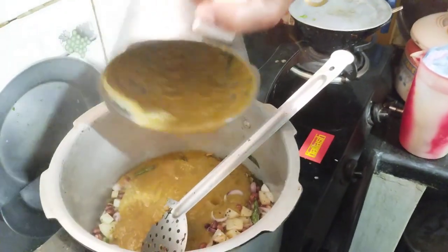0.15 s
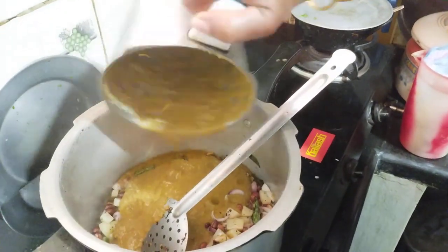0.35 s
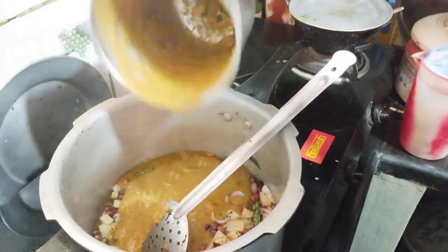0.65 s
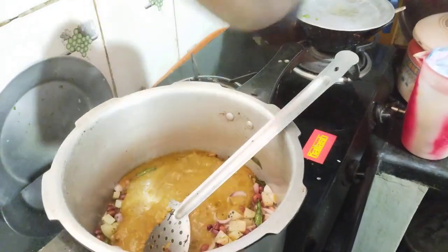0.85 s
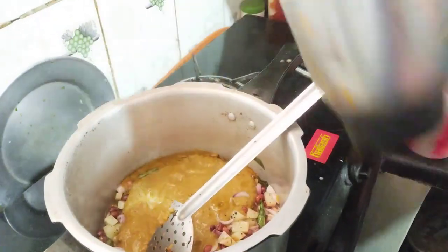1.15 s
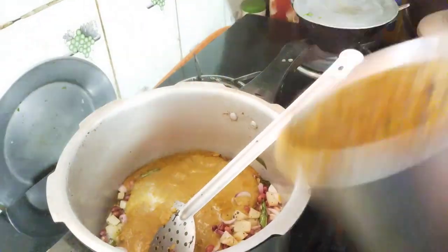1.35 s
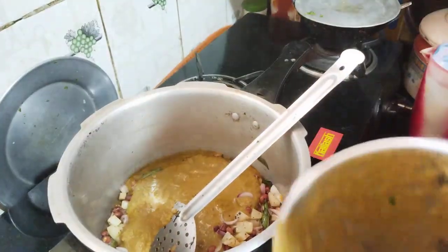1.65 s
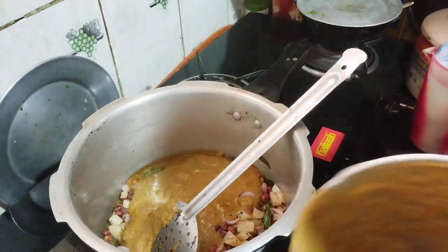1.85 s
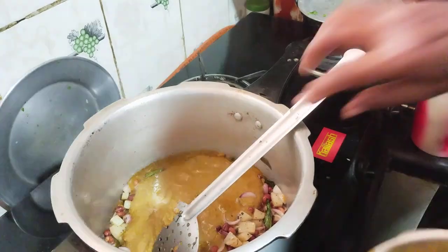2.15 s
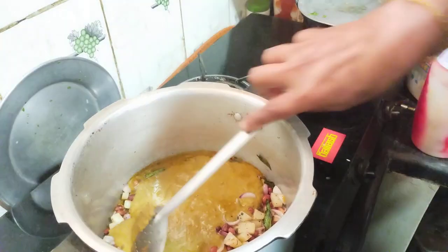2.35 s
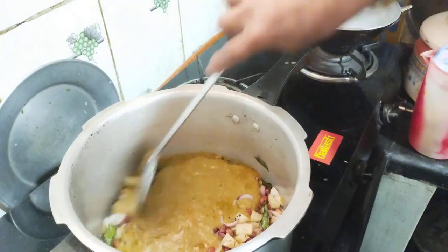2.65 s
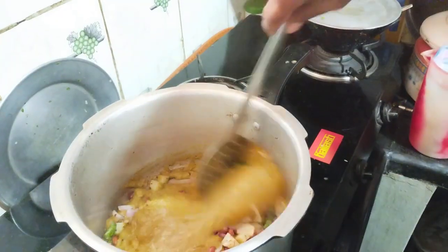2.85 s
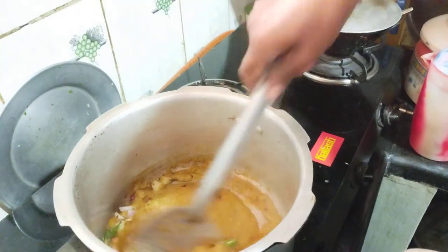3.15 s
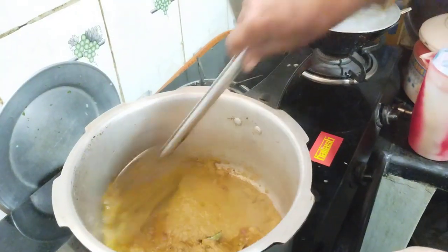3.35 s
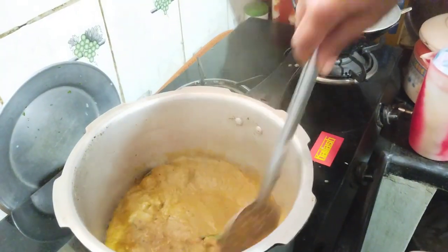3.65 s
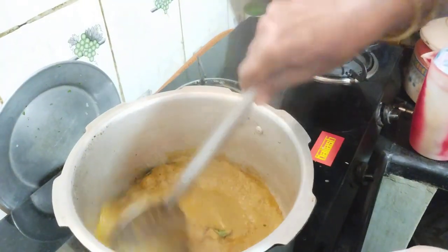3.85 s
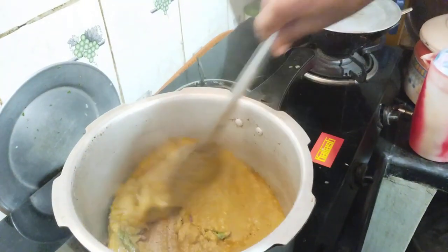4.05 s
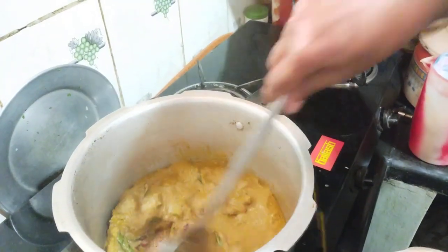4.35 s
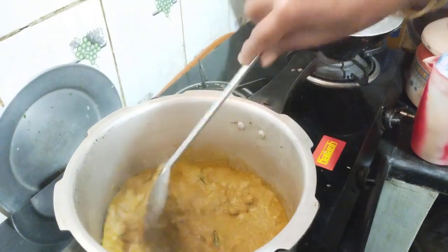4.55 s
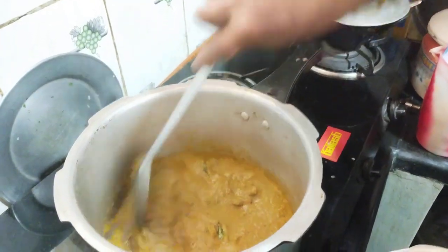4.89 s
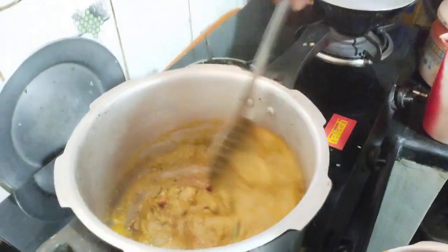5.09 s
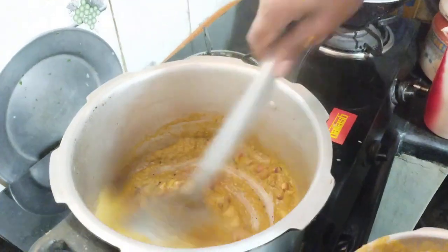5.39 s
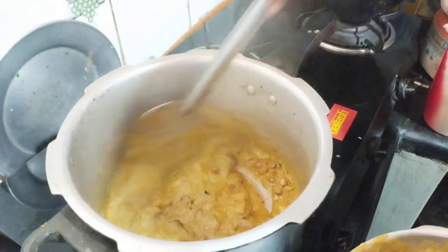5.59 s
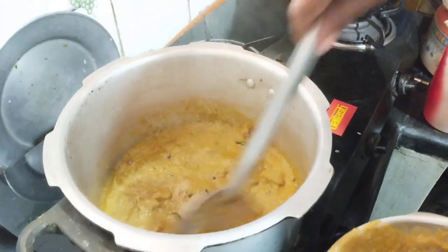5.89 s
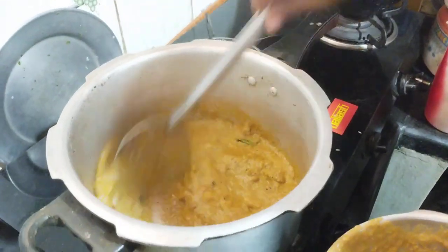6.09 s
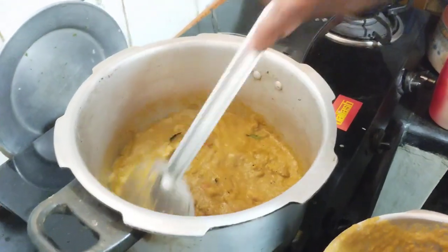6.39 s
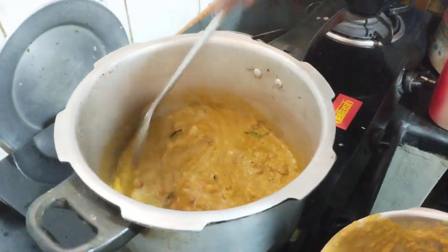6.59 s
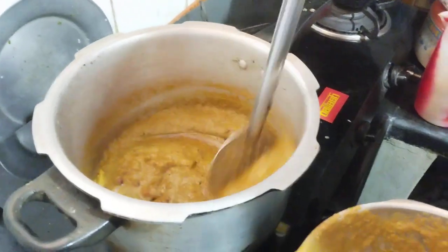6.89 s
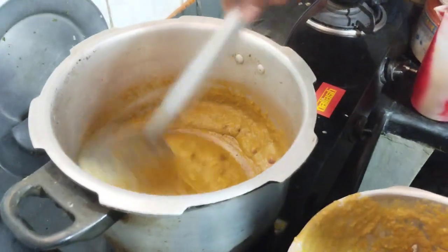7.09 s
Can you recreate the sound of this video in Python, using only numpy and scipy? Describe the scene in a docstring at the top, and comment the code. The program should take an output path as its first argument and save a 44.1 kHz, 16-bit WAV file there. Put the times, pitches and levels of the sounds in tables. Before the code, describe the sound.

Wet spice paste sizzles fiercely in hot oil inside a metal pot, spitting and crackling, while a steel spoon knocks, scrapes and stirs in sweeps.

```python
"""Kitchen with a gas stove: wet ground masala fries in hot oil in an open pressure cooker, heard close by.
Steam bubbles burst as random clicks coloured by the pot; the sizzle flares as wet paste meets hot metal, then cools.
Drops crackle and spit in the oil, and a spoon churns the paste in swelling sweeps of soft lumps.
A jar put down and a steel spoon knock as noise plus ringing modes; scrapes are stick-slip clicks.
Jar and rocking pot land with thud, boom and clank, over the burner's filtered noise and two hums."""
import sys
import numpy as np
from scipy import signal
from scipy.fft import rfft, irfft
from scipy.io import wavfile

SR = 44100
rng = np.random.default_rng(int(sys.argv[2]) if len(sys.argv) > 2 else 0)


def digitize_waveform(pressure):
    """Quantize a signal to 16-bit integers and store it at the path in sys.argv[1].

    Rows of a 2-D input are taken as channels; values are limited to [-1, 1].
    """
    field = np.atleast_2d(pressure).T
    bounded = np.clip(field, -1, 1)
    quanta = np.round(bounded * 32767).astype(np.int16)
    wavfile.write(sys.argv[1], SR, quanta)


N = 318843
TAPS = 4096
TIME = np.arange(N) / SR
HZ = np.fft.rfftfreq(TAPS, 1 / SR)

# dense clatter of metal on metal: f/Hz, level/dB
CLATTER_SPECTRUM = [(30, -36), (150, -17), (280, 0), (500, -5.5), (850, -5.5), (1300, -4.5), (1650, -2),
                    (2200, 3), (3300, -2.5), (6000, 0.5), (9000, 6), (11500, -11), (15700, -36)]
# pot wall modes: f/Hz, mean level/dB, t60/s before stretch
WALL_MODES = [(547, -4, .3), (830, -6, .3), (1072, -5, .4), (1203, -6, .35), (1322, -5, .22),
              (1640, -10, .3), (1990, -1, .15), (2140, -2, .16), (2300, -4, .2), (2570, 0, .25),
              (2940, -7, .25), (4463, -7, .35)]


def amp(db):
    """Decibels to gain."""
    return 10 ** (np.asarray(db) / 20)


def unit(x):
    """Scales to rms 1."""
    return x / np.sqrt(np.mean(x ** 2) + 1e-20)


def read(points, hz):
    """Interpolates a dB spectrum on a log-frequency axis."""
    f, db = np.transpose(points)
    return np.interp(np.log(hz + 1), np.log(f), db)


def add(mix, start_s, sound):
    """Adds a sound into mix at start_s, cut at the end."""
    part = mix[max(round(start_s * SR), 0):][:len(sound)]
    part += sound[:len(part)]


def colour(x, db):
    """Minimum-phase filter with the gain db on the grid HZ, via the folded cepstrum."""
    cepstrum = irfft(np.log(amp(np.maximum(db, -100))))
    cepstrum[1:TAPS // 2] *= 2
    cepstrum[TAPS // 2 + 1:] = 0
    impulse = irfft(np.exp(rfft(cepstrum)))
    return signal.oaconvolve(x, impulse)[:len(x)]


def shaped(x, db):
    """Colours a white sound and keeps its power."""
    return colour(x, db) / np.sqrt(np.mean(amp(db) ** 2))


def drift(rate_hz):
    """Smooth random signal of rms 1, varying about rate_hz times a second."""
    f = np.fft.rfftfreq(N, 1 / SR)
    band = np.exp(-(f / rate_hz) ** 2) * (f > rate_hz / 8)
    return unit(irfft(rfft(rng.standard_normal(N)) * band, N))


def bursts(per_s, spread_db, cap=2.4):
    """Random clicks of rms 1: many small, a few large; sizes exponential in dB up to a cap."""
    size = amp(spread_db * np.minimum(rng.exponential(1, N), cap))
    sign = rng.choice([-1, 1], N)
    fires = rng.random(N) < per_s / SR
    return unit(size * sign * fires)


def scatter(clicks, t60_s, wet_db):
    """Each click bounces round the pot: its energy lingers as a dying noise wash."""
    keep = 1e-6 ** (1 / (t60_s * SR))
    energy = signal.lfilter([1 - keep], [1, -keep], clicks ** 2)
    wash = np.sqrt(energy) * rng.standard_normal(N)
    return unit(clicks + amp(wet_db) * wash)


def echoes(x, t60_s, wet_db, gap_s):
    """Adds a dense decaying tail of reflections that starts after gap_s."""
    t = np.arange(SR // 2) / SR
    tail = rng.standard_normal(len(t)) * amp(-60 * t / t60_s) * (t > gap_s)
    wet = signal.oaconvolve(x, tail / np.linalg.norm(tail))[:len(x)]
    return (x + amp(wet_db) * wet) / np.hypot(1, amp(wet_db))


def pot_air():
    """Gain in dB of the pot's air cavity: resonant peaks on the grid HZ."""
    # air resonances: f/Hz, full width at half lift/Hz, lift/dB before the caller's scaling
    air_modes = [(199, 20, 15.5), (484, 96, 10), (649, 84, 6), (1314, 200, 8), (2070, 130, -0.5),
                 (2200, 330, 0), (3500, 33, 7.5), (5880, 720, 5)]
    return sum(db / (1 + (2 * (HZ - hz) / width_hz) ** 2) for hz, width_hz, db in air_modes)


def wall_colour(lift_db, width_hz):
    """Gain in dB that the wall modes give to whatever rubs on the wall."""
    return sum(lift_db / (1 + (2 * (HZ - hz) / width_hz) ** 2) for hz, _, _ in WALL_MODES)


def ring(modes, t, lowpass_hz, stretch):
    """Exponentially dying modes; each blow re-weights them at random, as if struck on another spot."""
    hz, db, t60_s = np.transpose(modes)[:, :, None]
    size = amp(db + rng.standard_normal(hz.shape)) / np.hypot(1, (hz / lowpass_hz) ** 2)
    decay = np.exp(-np.log(1000) * t / (t60_s * stretch))
    tone = np.sin(2 * np.pi * (hz * t + rng.random(hz.shape)))
    return (size * decay * tone).sum(0)


def clank(t, edge_hz, ring_db, stretch, decay_s, snap_db):
    """Metal meets metal: snap, clatter and wall ring; harder, lighter taps lack bass."""
    snap = amp(snap_db) * np.exp(-t / .0015)
    dying = snap + np.exp(-t / decay_s) + .08 * np.exp(-t / .04)
    bass_hz = 1350 * (edge_hz / 9000) ** 3  # softer, heavier blows reach lower
    thin = -10 * np.log10(1 + (bass_hz / (HZ + 1)) ** 2)
    dull = -10 * np.log10(1 + (HZ / edge_hz) ** 3)
    shape = read(CLATTER_SPECTRUM, HZ) + 0.52 * pot_air() + thin + dull
    clatter = shaped(rng.standard_normal(len(t)) * dying, shape)
    return clatter + amp(ring_db) * colour(ring(WALL_MODES, t, edge_hz, stretch), thin)


def kitchen(burner_db=-49):
    """The gas flame rushes as low filtered noise over two hums of wandering phase."""
    # burner rush: f/Hz, relative level/dB
    rush = [(15, -2), (30, 7.5), (70, 1.5), (100, -1), (145, -16), (220, -4), (400, -9), (900, -13),
            (3000, -18)]
    # steady hums: f/Hz, rms level/dB
    hum_tones = [(49.5, -57), (81.5, -59.5)]
    flame = amp(burner_db) * unit(colour(rng.standard_normal(N), read(rush, HZ)))
    hum = np.zeros(N)
    for hz, db in hum_tones:
        phase = 2 * np.pi * hz * TIME + 0.42 * drift(3)
        hum += amp(db) * np.sqrt(2) * np.sin(phase)
    return flame + hum


def landings(boom_db=-1.0, thud_db=-2.1, thud_decay_s=0.028, clank_db=-2.0):
    """The jar set down, then the pot rocking: each lands twice with thuds, dull clanks and one low boom."""
    # landings, the jar's first, then the pot's: t/s, relative level/dB
    touchdowns = [(1.308, -26.5), (1.748, -30.5), (1.777, -34), (1.841, -38), (2.245, -40), (3.341, -32),
                  (3.833, -28), (4.36, -30.5), (5.474, -29), (5.549, -37.5), (6.012, -30), (6.447, -28.5),
                  (7.141, -32)]
    # low boom modes: f/Hz, mean level/dB, t60/s before stretch
    boom_modes = [(283, -5, .14), (346, -1, .48), (420, -10, .16)]
    # dull thud: f/Hz, relative level/dB
    thud_spectrum = [(40, -57), (150, -18), (250, -3.5), (420, -1.5), (540, -7), (900, -10.5), (2500, -29)]
    settle_s, settle_db = .017, -3
    out, t = np.zeros(N), np.arange(SR // 2) / SR
    onset = 1 - np.exp(-t / .002)
    for s, db in touchdowns:
        boom = ring(boom_modes, t, lowpass_hz=1600, stretch=0.98) * onset
        add(out, s, amp(db + boom_db) * boom)
        for delay_s, drop_db in [(0, 0), (settle_s, settle_db)]:
            noise = rng.standard_normal(len(t)) * np.exp(-t / thud_decay_s)
            thud = amp(thud_db) * shaped(noise, read(thud_spectrum, HZ))
            metal = clank(t, edge_hz=1950, ring_db=-8.5, stretch=1.1, decay_s=.021, snap_db=3)
            add(out, s + delay_s, amp(db + drop_db) * (thud + amp(clank_db) * metal))
    return out


def knocks(wall_db=-3):
    """Jar, then spoon, with one more clank of the rocking pot at 1.777 s: each blow is a metallic clank that
    bounces once."""
    # blows: t/s, relative level/dB, hardness as upper edge f/Hz, wall ring/dB before wall_db
    blows = [(1.306, -18, 5200, -1.5), (1.332, -27.5, 3400, -13), (1.645, -22.5, 1950, -10),
             (1.777, -29.5, 1400, -10), (2.242, -33.5, 1800, 2), (3.489, -14, 11800, -15),
             (3.663, -15.5, 9050, -6), (4.221, -15.5, 11000, -13), (4.772, -26, 2800, 1),
             (4.903, -24.5, 9000, -4), (6.369, -20.5, 3530, -2), (6.496, -31.5, 2900, 3.5),
             (6.722, -22.5, 8000, -6)]
    rebound_s, rebound_db = .007, -5.5
    out, t = np.zeros(N), np.arange(SR // 2) / SR
    for s, db, edge_hz, ring_db in blows:
        for delay_s, drop_db in [(0, 0), (rebound_s, rebound_db)]:
            blow = clank(t, edge_hz, ring_db + wall_db, stretch=0.32, decay_s=0.022, snap_db=3.5)
            add(out, s + delay_s, amp(db + drop_db) * blow)
    return out


def scrapes(level_db=0):
    """A metal edge sticks and slips, its clicks driving the wall modes and the pot's air."""
    # slides, narrow ones squeak or groan: t/s, length/s, level/dB, centre f/Hz, half-width/octaves
    slides = [(1.297, 0.038, -19, 2200, 0.21), (1.352, 0.21, -40, 350, 0.19), (1.56, .05, -22, 6000, 1.7),
              (2.631, 0.074, -20.5, 4040, 0.58), (3.32, 0.21, -28.5, 1670, 0.6),
              (3.67, 0.072, -23.5, 1680, 0.67), (3.993, 0.15, -27.5, 1300, 1.7),
              (4.414, .046, -23, 5670, .09), (4.9, 0.082, -25.5, 3300, 0.84),
              (4.901, .02, -23.5, 4250, .15), (5.193, .28, -36.5, 2020, 0.073),
              (5.566, .043, -31.5, 1560, 0.22), (5.874, 0.095, -42.5, 1700, 0.22),
              (6.418, 0.12, -30, 1000, 1.6), (6.552, 0.077, -18, 5400, 1.45), (6.563, 0.05, -25, 4280, .3),
              (6.561, .19, -27, 1750, 1.64), (7.045, 0.048, -30, 1800, 2.6), (7.19, .05, -31.5, 1620, 0.31)]
    out = np.zeros(N)
    slips = scatter(bursts(per_s=750, spread_db=3), t60_s=0.036, wet_db=1)
    pot = wall_colour(lift_db=8.5, width_hz=24) + .5 * pot_air() + read(CLATTER_SPECTRUM, HZ)
    for s, length_s, db, hz, octaves in slides:
        u = (TIME - s) / length_s
        inside = (u > 0) & (u < 1)
        press = np.sqrt(np.sin(np.pi * u[inside]))  # the edge bites, slides and lifts
        slide = np.pad(unit(slips[inside]) * press, (0, TAPS))  # room for the ring-out
        shape = pot - 3 * (np.log2((HZ + 1) / hz) / octaves) ** 2
        add(out, s, amp(db + level_db) * shaped(slide, shape))
    return out


def churn(level_db=-2, lumpy_db=2.0, arch=0.62):
    """The spoon ploughs through paste and onion: soft lumps sound the pot; each sweep swells and eases."""
    # spoon sweeps: start t/s, length/s, level/dB before level_db
    sweeps = [(2.45, 1, -44), (3.22, 0.78, -38), (3.85, 0.65, -38), (4.848, .7, -39.5), (5.447, 0.85, -44),
              (6.4, 0.34, -33.5), (6.8, 0.65, -41.5)]
    # churned paste: f/Hz, relative level/dB
    paste = [(80, -16), (140, -23), (195, -1.5), (280, -1.5), (420, 2), (560, -2.5), (850, -6), (1300, -4),
             (1900, -8.5), (3000, -20), (8000, -51)]
    lumps = scatter(bursts(per_s=400, spread_db=5.5), t60_s=0.056, wet_db=-0.5)
    body = unit(colour(lumps, read(paste, HZ) + wall_colour(lift_db=12, width_hz=25)))
    drag = np.zeros(N)
    for s, length_s, db in sweeps:
        u = np.arange(0, 1, 1 / (length_s * SR))
        add(drag, s, amp(db) * np.sin(np.pi * u).clip(0) ** arch)
    return body * drag * amp(level_db + lumpy_db * drift(15))


def spits(decay_s=0.0036, spread_oct2=0.27, level_db=-6):
    """A larger drop of water explodes in the oil: a short pitched noise pop."""
    # single spits, loud to faint: t/s, relative peak/dB, f/Hz
    pops = [(0.889, -1, 6000), (1.562, -2.5, 6250), (2.043, -11, 6050), (2.487, -13, 4460),
            (3.536, -13, 2570), (5.239, -16, 2400), (5.745, -34, 5000), (5.876, -33, 3020),
            (6.207, -32, 4500)]
    out, t = np.zeros(N), np.arange(TAPS) / SR
    for s, db, hz in pops:
        shape = pot_air() - 3 * np.log2((HZ + 1) / hz) ** 2 / spread_oct2
        pop = colour(rng.standard_normal(TAPS) * np.exp(-t / decay_s), shape)
        add(out, s, amp(db + level_db) * 2 * pop / abs(pop).max())
    return echoes(out, t60_s=0.16, wet_db=-14, gap_s=0.0022)


def frying():
    """Each flare rises quickly, replaces the last, then drifts steadily: level and fine spray in dB."""
    # flares of wet paste on hot metal: peak t/s, level/dB, cooling/(dB/s) (negative: swells), fine spray/dB
    flares = [(0, -15.5, 3.0, -1.5), (2.05, -20.5, -1.5, -3), (2.68, -17, -2, 0), (2.86, -13, 2.5, -1),
              (3.55, -13, 0, -1), (3.65, -12.5, 58, -1), (3.82, -14, 15, 0.5), (4.14, -16.5, 8.4, 0.5),
              (4.76, -19, 37, -3), (5.0, -16, 9.5, 1.7), (5.45, -18.5, 35.5, 1.5), (6.0, -25.5, 38.5, 0.5),
              (6.48, -28, 3, -8), (6.74, -18.3, 52, 1.7), (7.1, -27.5, 66, 1)]
    rise_s, spray_fade_db_per_s = 0.079, 0.8  # the finest bubbles die out first
    level, spray = np.full(N, flares[0][1], float), np.zeros(N)
    for s, db, cooling_db_per_s, spray_db in flares:
        share = np.clip(1 + (TIME - s) / rise_s, 0, 1)
        age_s = np.maximum(TIME - s, 0)
        level = level + share * (db - cooling_db_per_s * age_s - level)
        spray = spray + share * (spray_db - spray_fade_db_per_s * age_s - spray)
    return level, spray


def spatter(level_db=-18.0, centre_hz=4500, octaves=1.2):
    """Small drops crackle at random, their level following the frying."""
    drops = scatter(bursts(per_s=30, spread_db=4), t60_s=0.034, wet_db=6)
    shape = pot_air() - 3 * (np.log2((HZ + 1) / centre_hz) / octaves) ** 2
    return unit(colour(drops, shape)) * amp(frying()[0] + level_db)


def sizzle(coarse_db=0.66, main_db=0, fine_db=0, surge_db=0.75, patch_db=0.07, low_hz=6800, high_hz=11000):
    """Bubble bursts sound through the pot; three bands, for three bubble sizes, share the same bursts."""
    # bursting bubbles: f/Hz, relative level/dB
    bubble = [(90, -33), (150, -42.5), (220, -27.5), (950, -24.5), (1750, -18.5), (2050, -6.5), (3100, -14),
              (5000, -9), (6700, -10), (8200, 0.5), (9100, -0.5), (10200, -4), (12000, -8), (15700, -9.5)]
    fierce_db, coarse_loss = -17.5, 0.62  # above this level coarse bubbles fall behind, in dB per dB
    heat, spray = frying()
    level = heat + surge_db * drift(33)
    low = 1 / (1 + (HZ / low_hz) ** 12)
    high = 1 / (1 + (HZ / high_hz) ** 12)
    shape = read(bubble, HZ) + pot_air()
    shape = shape - 10 * np.log10(np.mean(amp(shape) ** 2 * (high - low)))  # middle band as reference
    coarse = coarse_db - coarse_loss * np.maximum(heat - fierce_db, 0)
    sizes = [(low, coarse), (high - low, main_db), (1 - high, fine_db + spray)]
    clicks = scatter(bursts(per_s=5000, spread_db=2.0), t60_s=0.067, wet_db=2.5)
    fry = colour(clicks, shape)
    out = np.zeros(N)
    for share, db in sizes:
        kernel = np.fft.fftshift(irfft(share))[1:]
        band = signal.oaconvolve(fry, kernel, "same")
        out += band * amp(level + db + patch_db * drift(100))
    return out


def scene():
    """All sounds but the burner and hums echo briefly in the tiled kitchen; both channels are identical."""
    pot = sizzle() + churn() + spatter() + spits() + knocks() + landings() + scrapes()
    mono = echoes(pot, t60_s=.14, wet_db=-13, gap_s=.003) + kitchen()
    return np.array([mono, mono])


def record(dry):
    """Hard-clips the loudest peaks, then limits the band."""
    clipped = np.clip(dry, -.92, .92)
    lowpass = signal.firwin(1023, 15780, window=("kaiser", 9), fs=SR)  # edge in Hz
    return signal.oaconvolve(clipped, lowpass[None], "same")


dry = scene()
out = record(dry)
digitize_waveform(out)
```